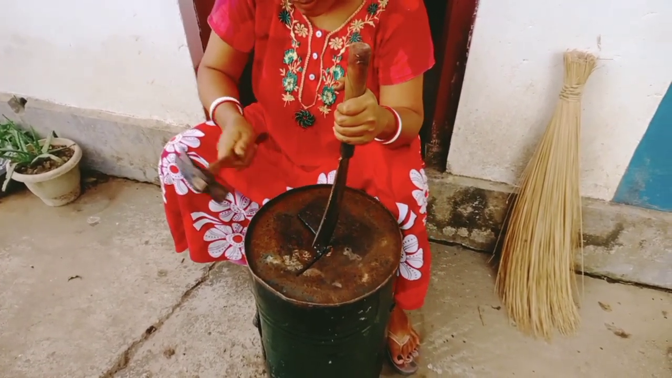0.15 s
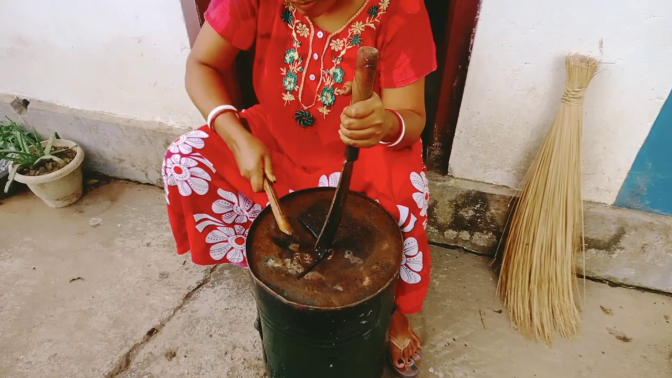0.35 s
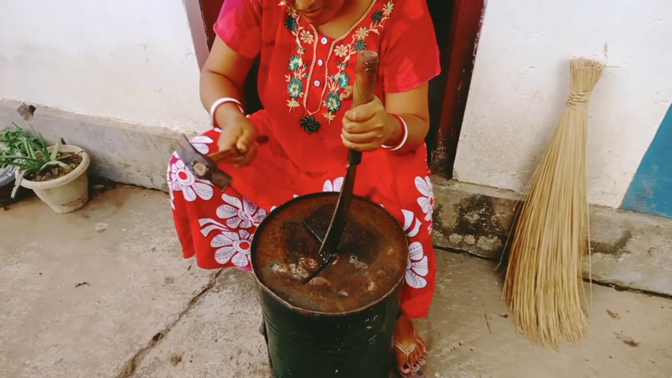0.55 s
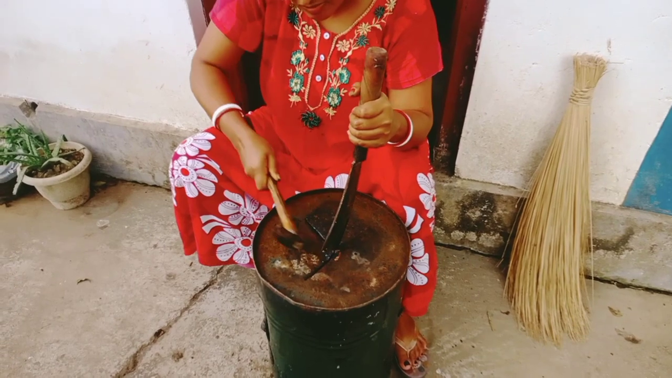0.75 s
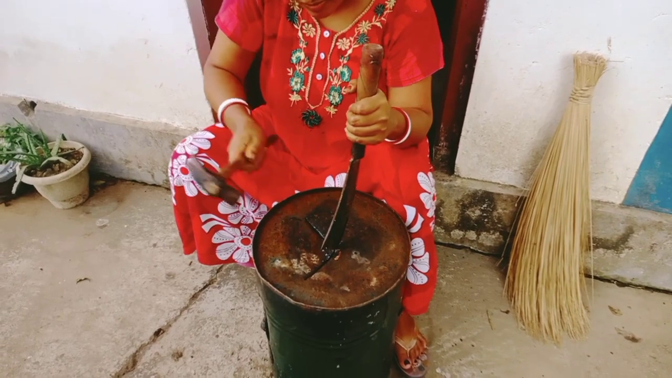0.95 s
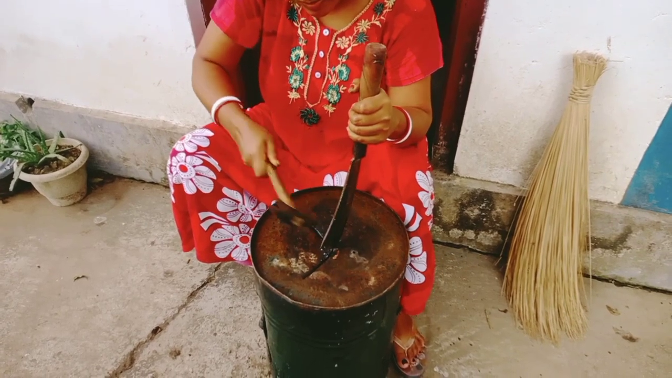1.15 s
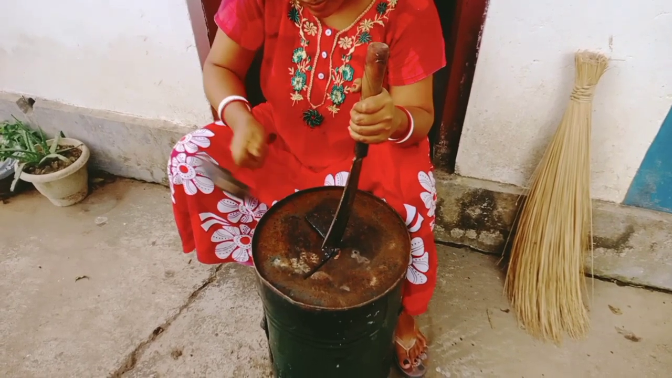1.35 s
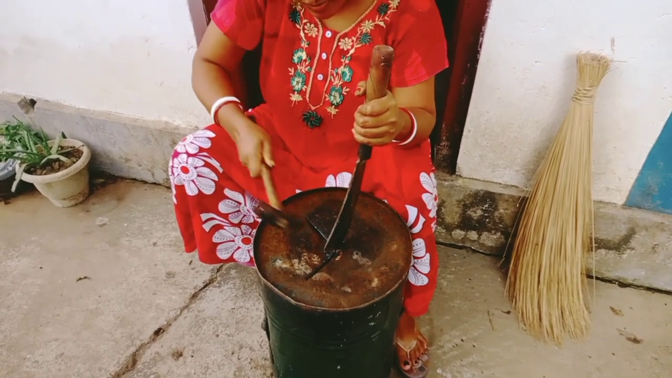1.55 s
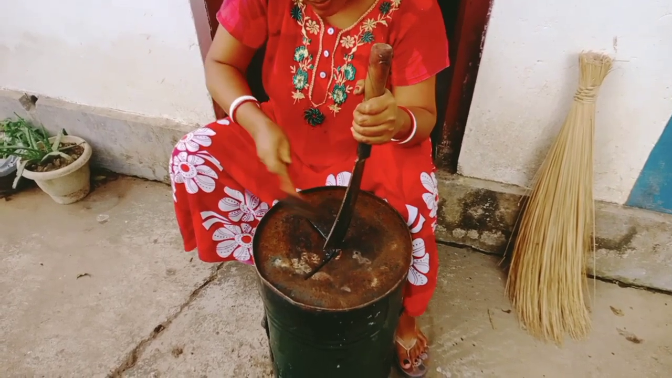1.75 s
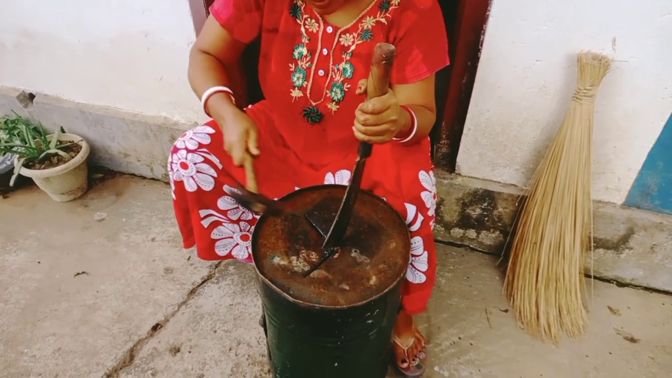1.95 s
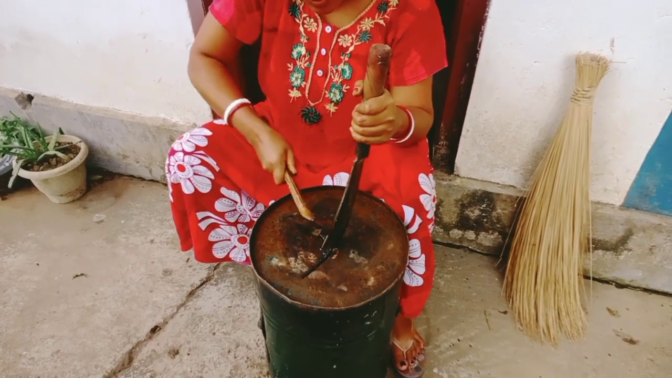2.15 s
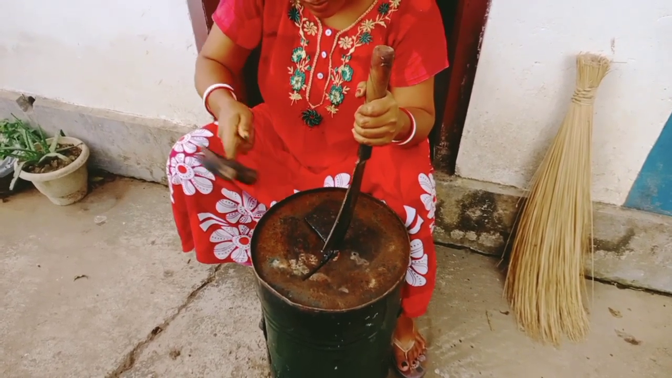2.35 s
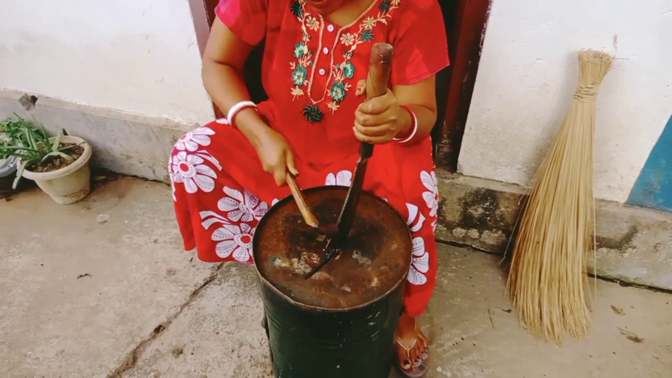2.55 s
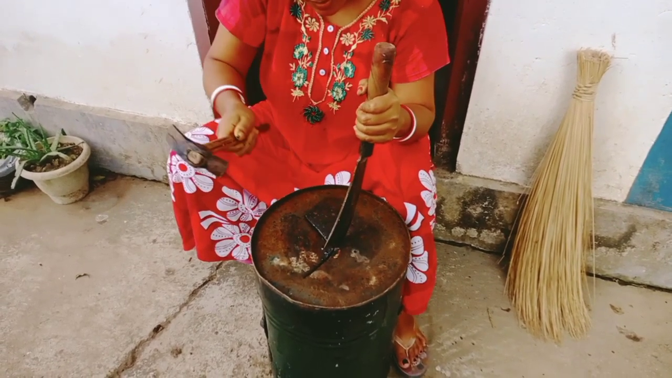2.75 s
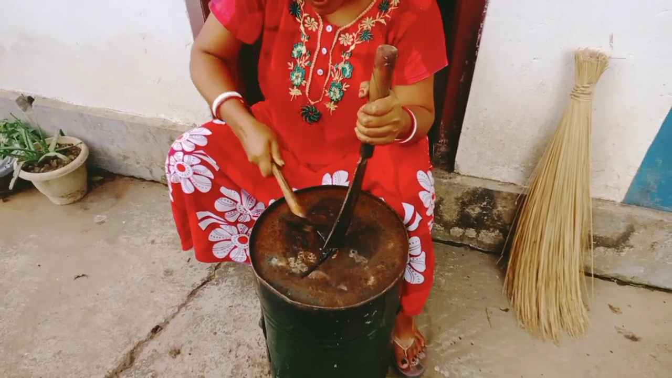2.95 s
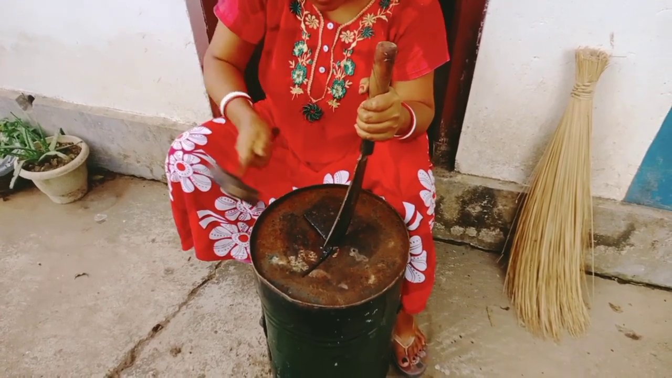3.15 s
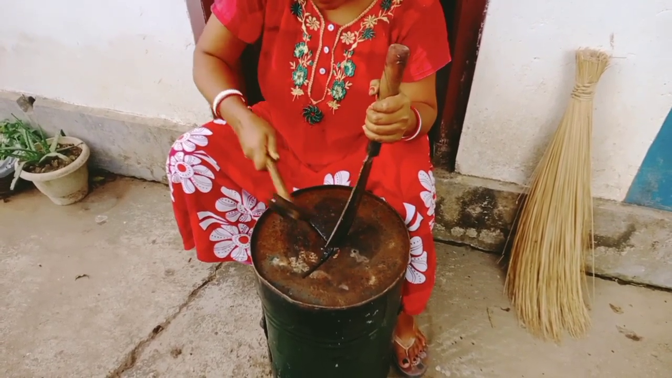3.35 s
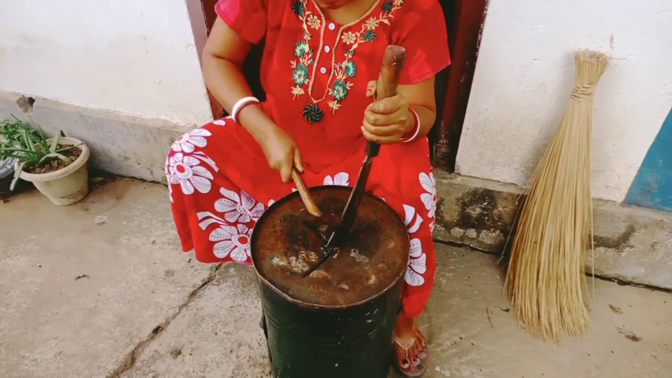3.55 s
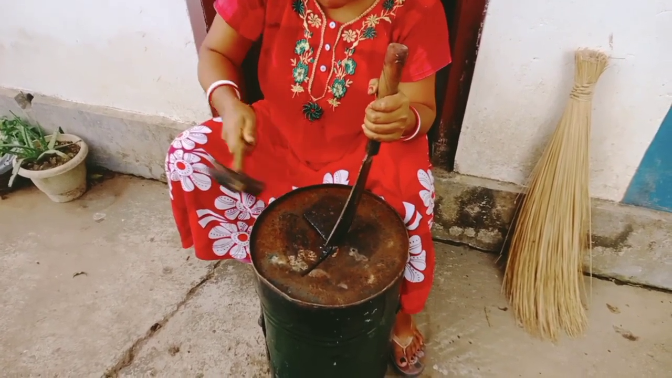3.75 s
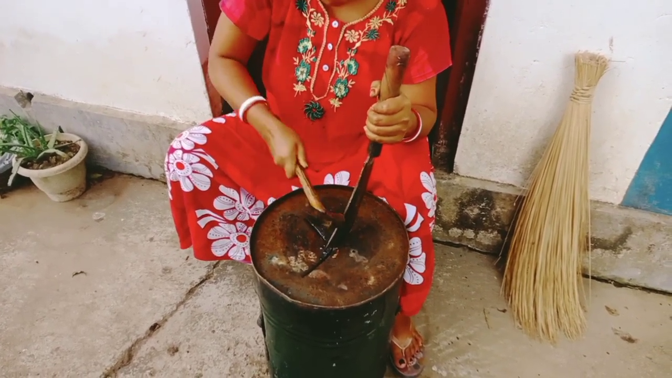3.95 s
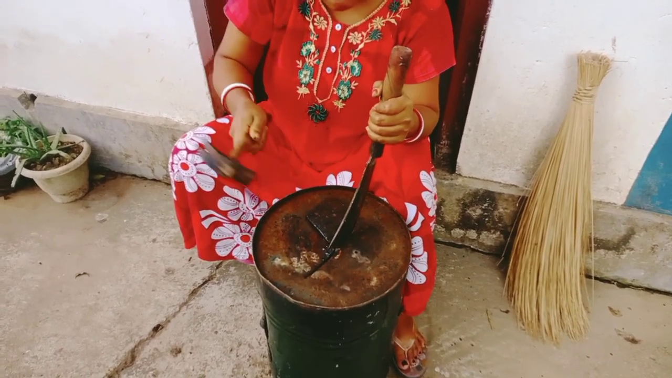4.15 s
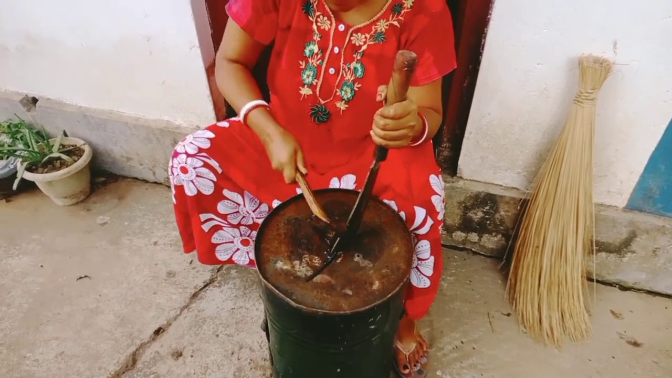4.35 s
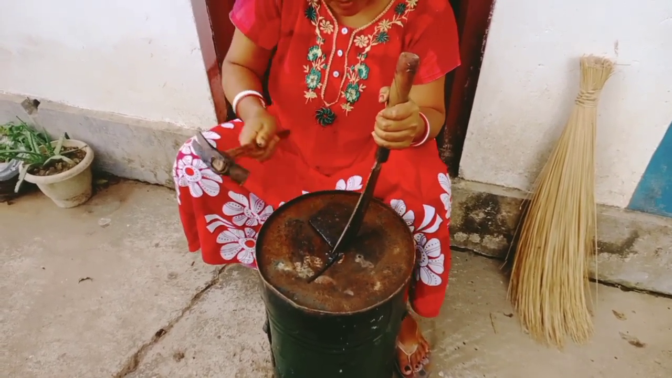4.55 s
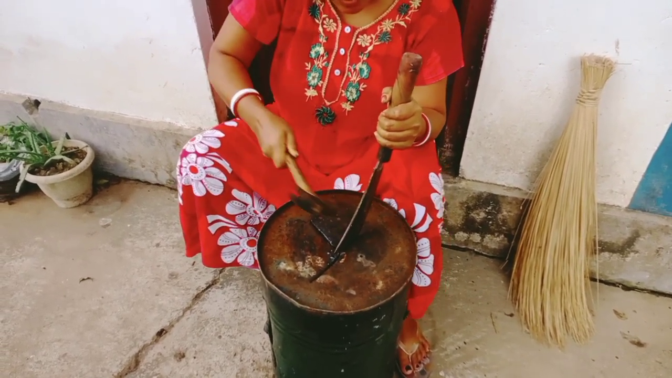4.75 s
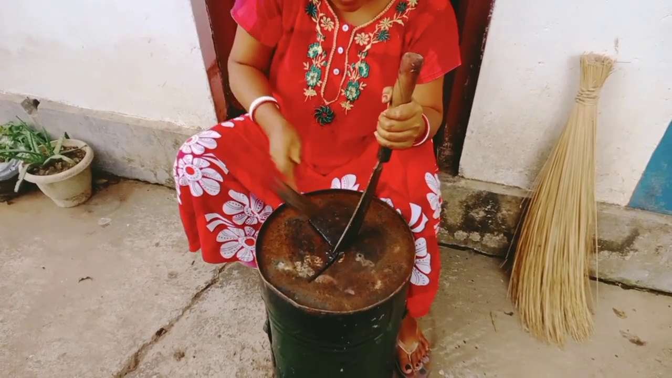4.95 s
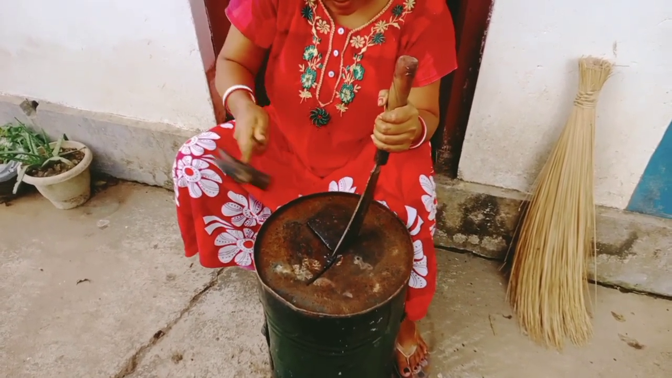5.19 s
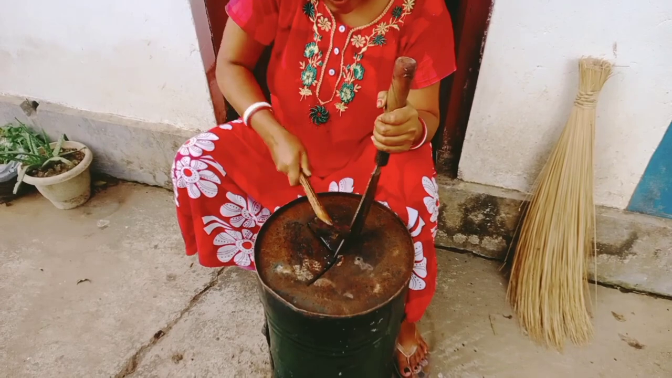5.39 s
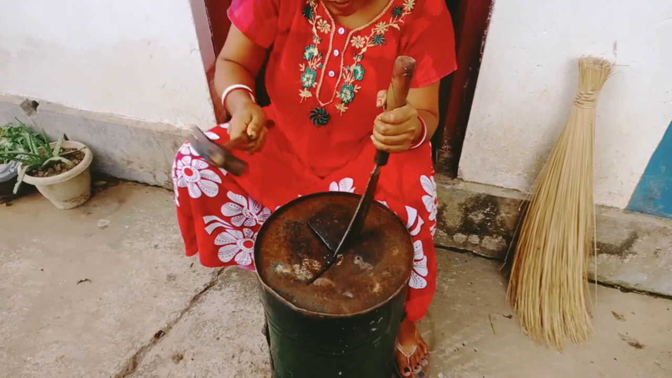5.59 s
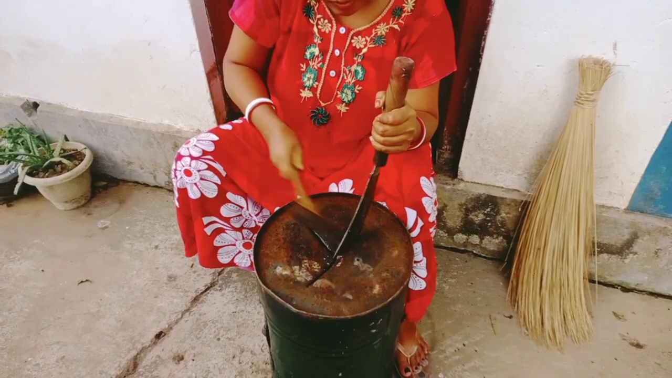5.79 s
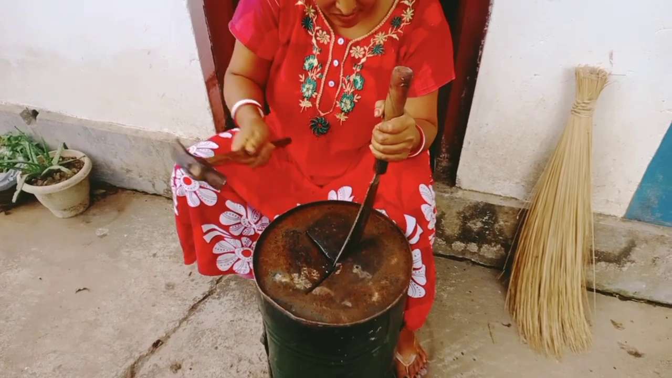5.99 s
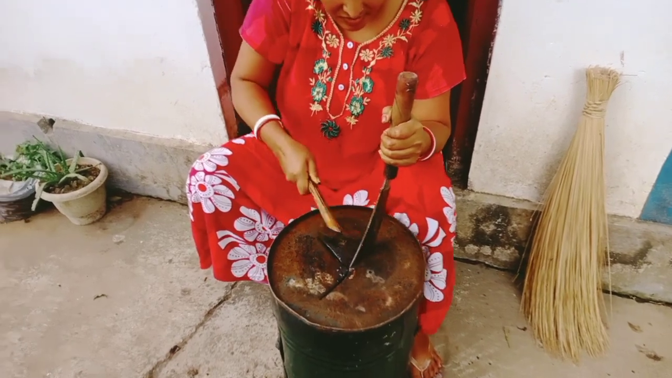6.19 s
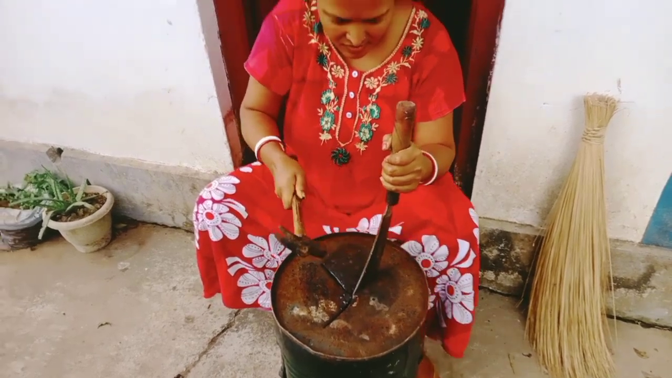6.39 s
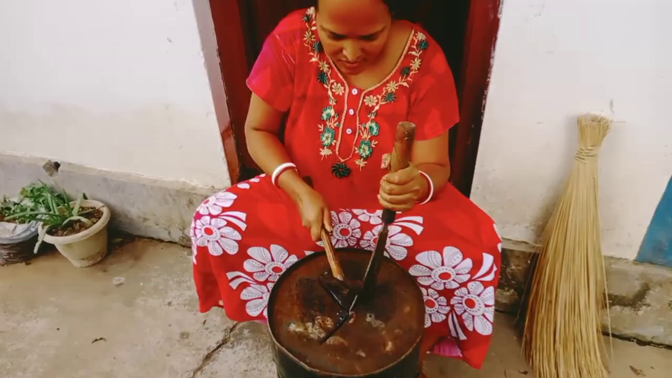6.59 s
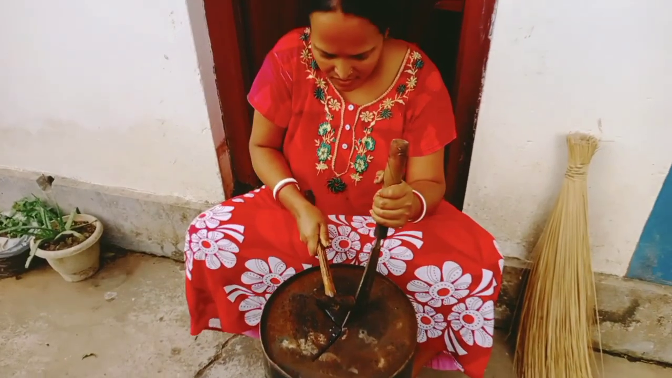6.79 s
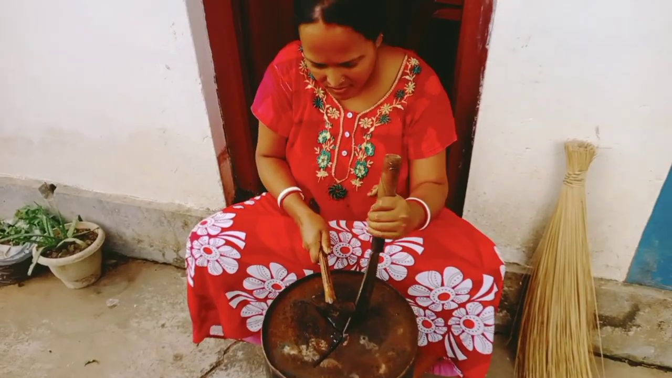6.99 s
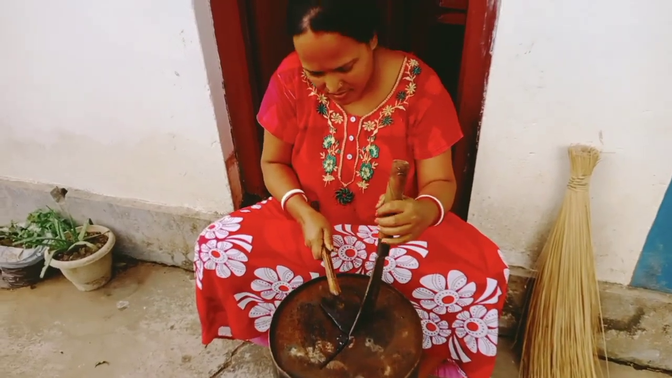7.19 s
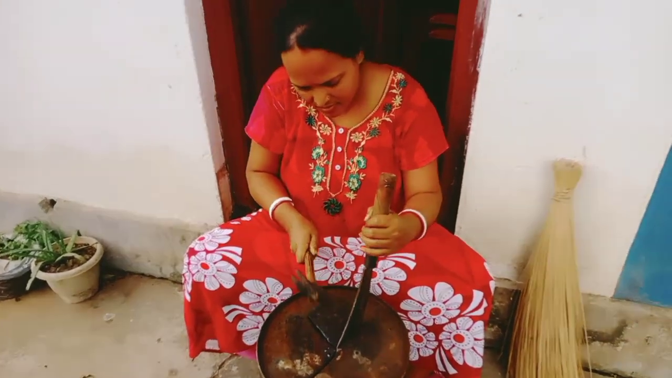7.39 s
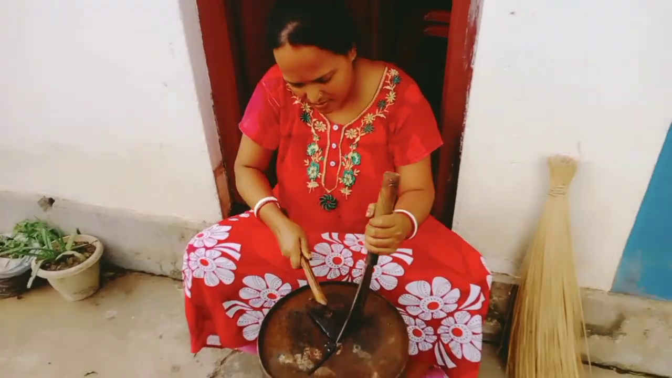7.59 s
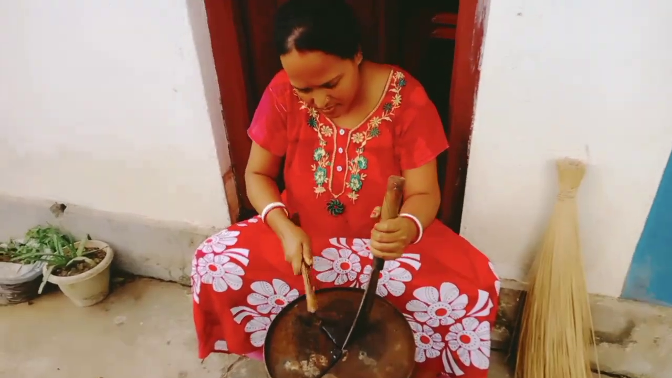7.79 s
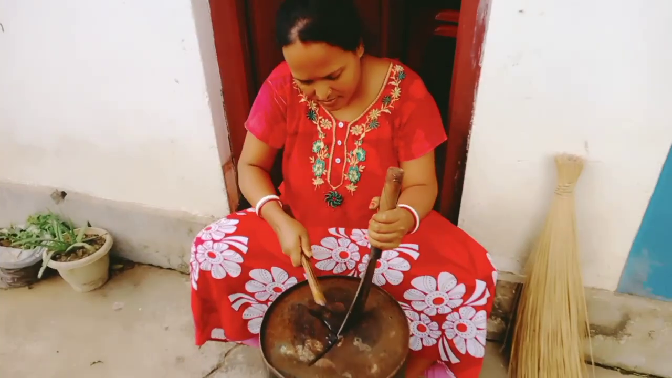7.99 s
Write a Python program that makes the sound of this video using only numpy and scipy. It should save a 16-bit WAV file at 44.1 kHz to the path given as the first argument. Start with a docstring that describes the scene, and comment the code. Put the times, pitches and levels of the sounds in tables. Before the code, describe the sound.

Close, sharp metallic strikes repeat at an even pace as a hammer knocks a blade through a drum lid. Every hit tears the sheet briefly, booms in the drum and leaves the lid ringing. Faint outdoor hiss lies behind, with a few thin, falling bird whistles early on. The hammering then grows lighter, breaks off for a soft scrape, and ends with two taps.

```python
"""Cutting open a metal drum

A hammer drives a blade through the rusty sheet-metal lid of a drum, in a yard beside a house wall.
Each blow tears the sheet with a short crack, thumps the drum and sets the lid ringing.
The last taps are lighter. A bird whistles far off, over a soft hiss and murmur.
A phone close by turns the sound down just ahead of each loud blow and flattens what is left of the peak."""
import sys
import numpy as np
from scipy import signal
from scipy.fft import rfft, irfft
from scipy.io import wavfile
from scipy.ndimage import uniform_filter1d, minimum_filter1d

SR = 44100
rng = np.random.default_rng(int(sys.argv[2]) if len(sys.argv) > 2 else 0)


def inscribe(sig):
    """Save sig as 16-bit PCM at rate SR to the path in sys.argv[1].

    A 1-D sig is mono; a 2-D sig holds one channel per row.
    Samples are clipped to [-1, 1] before scaling.
    """
    pcm = np.round(np.clip(np.atleast_2d(sig).T, -1, 1) * 32767)
    wavfile.write(sys.argv[1], SR, pcm.astype(np.int16))


N = 354123
RING_TIME = np.arange(SR) / SR  # one second for a sound to ring out

# the neighbourhood (time [s], murmur level [dB], hiss level [dB])
YARD_LEVELS = [(0, -41, -45.5), (1.3, -50, -47), (5.1, -45.5, -47), (6.2, -72, -55), (8.03, -75, -52.5)]
# the bird's falling whistles (time [s], length [s], level [dB])
WHISTLES = [(0.135, 0.096, -31), (.562, 0.038, -28.5), (0.961, 0.051, -29.5), (1.179, 0.058, -34.5),
            (1.398, .036, -29), (1.616, 0.056, -37.5)]
# faint, steady notes that lead into them (time [s], length [s], pitch [Hz], level [dB])
LEAD_NOTES = [(0, .17, 3036, -45), (0.509, .05, 4100, -42.5), (0.918, .05, 4080, -44),
              (1.348, 0.081, 4130, -48.5)]

# spectra: how strong a noise is from bass to treble (frequency [Hz], level [dB])
MURMUR_SPECTRUM = [(25, -9.5), (50, -15), (76, 2), (110, 0.5), (220, -2), (400, -4), (800, -12),
                   (2000, -20.5), (5000, -59)]  # the yard's low murmur
HISS_SPECTRUM = [(150, -21), (700, -16), (1100, -1.5), (1700, 4), (2450, 6.5), (3300, 0.5), (5000, -9),
                 (7000, -17), (9500, -30.5), (15000, -42)]  # outdoor hiss
CRACK_SPECTRUM = [(100, -8.5), (250, 12), (500, 3), (900, 3), (1500, -0.5), (2300, 1.5), (3300, -1.5),
                  (4500, -3.5), (5400, -11.5), (6400, -6), (7300, -36), (11500, -34), (14400, -23.5),
                  (16000, -49)]  # tearing metal
BOOM_SPECTRUM = [(60, -24), (100, -6), (135, 7.5), (175, 15.5), (290, 4), (380, -12.5), (480, -14),
                 (700, -52)]  # the drum's body
LID_SPECTRUM = [(250, -10.5), (450, 3), (700, -3), (1200, -4.5), (2300, -2.5), (3100, -6), (4300, -9.5),
                (5000, -14.5), (6600, -14), (7300, -25.5), (9000, -29.5), (12000, -37.5), (14400, -35.5),
                (15700, -44)]  # the shimmering lid

# modes: the notes a thing rings with when struck (pitch [Hz], level [dB], time to fade by 60 dB [s])
SHELL_MODES = [(175.5, 1.5, 0.32), (217.4, -3, 0.68), (272.6, 1.5, 0.43), (313, 8, 0.27),
               (348.8, 2.5, 0.37)]  # the drum's wall
HOLLOW_MODE = [(485, 0, .25)]  # the drum's hollow note
DRUMHEAD_MODE = [(113.5, 0, .58)]  # the whole lid swinging
LID_MODES = [(748, -8, .32), (870, -11, .42), (922, 0, .34), (1172, -5, .42), (1324, -11, .32),
             (1551, -2, .31), (1634, -9, .3), (1688, -8, .3), (1713, -8, .28), (1794, -8, .27),
             (1956, -8, .36), (1976, -8, .38), (2083, -11, .36), (2180, -10, .38), (2225, -9, .35),
             (2332, -9, .33), (2842, -11, .35), (3410, -13, .38), (3694, -15, .36), (4002, -16, .33)]  # the lid's clearest notes
HAMMER_MODES = [(14210, -4, .22), (14300, -1, .28), (14380, 0, .28), (14480, -5, .2)]  # the hammer head's thin zing
# the blade's modes (pitch [Hz], level when free [dB], level when wedged [dB], time to fade by 60 dB [s])
BLADE_MODES = [(5470, -16, 0, .25), (6205, -1, -9, .22), (6250, 1, -6, .2), (6540, -8, -14, .3),
               (9950, -34, -18, .3)]

# how deep the blade sits in the lid (time [s], depth [0-1])
BLADE_DEPTH = [(0, 0), (4.7, 0.29), (5.8, 1), (6.6, 1), (8.03, 0.18)]
# the blade is nudged in its slot (time [s], drum level [dB], scrape level [dB])
NUDGES = [(6.885, -45, -73), (6.93, -49, -70), (6.978, -41.5, -38.5), (7.64, -49, -62)]
# hammer blows (time [s], force [dB], tear length [s], tear pitch [Hz], hardness of contact [dB],
# shove against the ground [dB])
BLOWS = [(0.2708, 2.5, 0.0032, 1570, -2, -0.5), (0.6872, 3, 0.0063, 1850, -4.5, 1.5),
         (1.0609, 1, 0.0062, 1800, -1, -11), (1.4407, -2.5, 0.0052, 1650, 0.5, -11),
         (1.8086, -1.5, 0.0054, 425, 1, -12), (2.1632, 0.5, 0.002, 2200, 0, -17),
         (2.5307, 4, 0.006, 2480, -4, 0.5), (2.8895, 3.5, 0.0077, 1630, -6, -5),
         (3.2425, 2.5, 0.0042, 1900, -1.5, -9), (3.5842, 0.5, 0.0052, 670, -5, -3.5),
         (3.9464, 1, 0.0043, 2350, -8, -7), (4.289, 3, 0.0076, 1340, 1, -2),
         (4.6471, 3.5, 0.0061, 490, -2, -3.5), (5.017, 1.5, 0.0061, 2230, -5.5, -12),
         (5.369, 0, .0041, 470, -5, -14.5), (5.7413, -1, 0.0066, 2000, -3.5, -5),
         (6.1092, -3.5, 0.0053, 577, -1.5, -17.5), (6.5888, -6.5, 0.0024, 516, -8.5, -32),
         (7.4461, -4, .0075, 500, 0, -18), (7.765, -5.5, .003, 2780, -6.5, -32)]
# how each named part answers a blow (base level [dB], gain with force [dB per dB],
# gain with hardness [dB per dB], gain once the cut is wide [dB])
PART_LEVELS = {"crack": (6, 1, 0.5, -1), "drumhead": (-22, 0.18, 0.45, -15),
               "boom": (-1.04, 1.09, 0.48, -1.5), "hollow": (-14.5, 0.75, 0.1, 4.5),
               "lid": (-5, 0.9359, 0.05, -1), "rattle": (-6.5, 1.4, 0.23, 1), "ping": (-27.5, .4, 1, -1.5),
               "zing": (-49.5, 1, 0.5, -2)}


def undb(db):
    """Turn decibels into a number to multiply by."""
    return 10 ** (np.asarray(db) / 20)


def add(track, s, sound):
    """Mix a sound into the track, starting at s seconds."""
    start = max(int(s * SR), 0)
    part = sound[:max(len(track) - start, 0)]
    track[start:start + len(part)] += part


def colour(x, spectrum):
    """Shape a sound with a spectrum; white noise keeps its power."""
    hz, db = np.transpose(spectrum)
    f = np.fft.rfftfreq(len(x), 1 / SR) + 1e-9
    gain = undb(np.interp(np.log(f), np.log(hz), db)) * np.minimum(f / hz[0], 1) ** 2
    return irfft(rfft(x) * gain / np.sqrt(np.mean(gain ** 2)), len(x))


def brighten(spectrum, db, low_hz=3000, high_hz=11000):
    """Raise or lower the treble: a harder contact is brighter."""
    return [(hz, level + db / (1 + (low_hz / hz) ** 4 + (hz / high_hz) ** 4)) for hz, level in spectrum]


def fade(t60):
    """Die away, falling by 60 dB in t60 seconds."""
    return np.exp(-np.log(1000) * RING_TIME / t60)


def ring(modes, scatter_db, detune):
    """Struck modes ring; each blow lands somewhere new, so their levels and pitches vary a little."""
    out = np.zeros(SR)
    for (hz, db, t60), (weight, bend, side) in zip(modes, rng.standard_normal((len(modes), 3))):
        t = RING_TIME[:int(t60 * SR)]
        wave = np.sin(2 * np.pi * hz * (1 + detune * bend) * t) * np.exp(-np.log(1000) * t / t60)
        add(out, 0, np.sign(side) * undb(db + scatter_db * weight) * wave)
    return out


def crowded_modes(pattern, spectrum, kept):
    """Countless close modes blur into noise; a share is kept from blow to blow, the rest is new."""
    mixed = np.sqrt(kept) * pattern + np.sqrt(1 - kept) * rng.standard_normal(SR)
    return colour(mixed, spectrum)


def yard():
    """Smooth outdoor hiss over a low murmur that dies away."""
    t = np.arange(N) / SR
    times, murmur_db, hiss_db = np.transpose(YARD_LEVELS)
    murmur = undb(np.interp(t, times, murmur_db)) * colour(rng.standard_normal(N), MURMUR_SPECTRUM)
    hiss = undb(np.interp(t, times, hiss_db)) * colour(rng.standard_normal(N), HISS_SPECTRUM)
    return murmur + hiss


def bird(end_hz=2420, fall_hz_per_s=4800, waver=.008, echo_db=-8):
    """Faint steady notes and thin falling whistles, with a short echo from the houses."""
    out = np.zeros(N)
    falling = [(s, length, end_hz, fall_hz_per_s, db) for s, length, db in WHISTLES]
    steady = [(s, length, hz, 0, db) for s, length, hz, db in LEAD_NOTES]
    for s, length, last_hz, fall, db in falling + steady:
        progress = np.linspace(0, 1, int(length * SR))
        wobble = np.interp(progress, np.linspace(0, 1, 12), rng.standard_normal(12))
        hz = (last_hz + fall * length * (1 - progress)) * (1 + waver * wobble)
        tone = np.sin(2 * np.pi * np.cumsum(hz) / SR)
        add(out, s, undb(db) * np.sin(np.pi * progress) * tone)
    houses = rng.standard_normal(SR) * fade(.35)
    echo = signal.fftconvolve(out, houses / np.linalg.norm(houses))[:N]
    return out + undb(echo_db) * echo


def nudges(swell_s=0.0077):
    """The blade shifts softly in the cut with a dull scrape; the drum murmurs."""
    out = np.zeros(N)
    swell = 1 - np.exp(-RING_TIME / swell_s)
    for s, drum_db, scrape_db in NUDGES:
        drum = colour(rng.standard_normal(SR), BOOM_SPECTRUM) * fade(0.51)
        scrape = colour(rng.standard_normal(SR), brighten(LID_SPECTRUM, -21)) * fade(0.24)
        add(out, s, swell * (undb(drum_db) * drum + undb(scrape_db) * scrape))
    return out


def thump(hz=78, t60=0.072):
    """The drum is shoved against the ground."""
    return np.sin(2 * np.pi * hz * RING_TIME) * fade(t60)


def boom(pattern, crowd_db=-18.5, shell_db=-22, t60=0.53):
    """The drum's wall booms: a few strong modes among many close ones."""
    shell = ring(SHELL_MODES, scatter_db=2, detune=.012)
    crowd = crowded_modes(pattern, BOOM_SPECTRUM, kept=0.34) * fade(t60)
    return undb(crowd_db) * crowd + undb(shell_db) * shell


def hollow(depth, width, clonk_db=5, clonk_t60=.16, muffle_db=11, rise_hz=3):
    """The drum's hollow note rises as the cut opens; a slack lid adds a clonk, softer if wedged."""
    hz, db, t60 = HOLLOW_MODE[0]
    clonk = width * undb(clonk_db - muffle_db * depth) * fade(clonk_t60)
    tone = np.sin(2 * np.pi * (hz + rise_hz * width) * RING_TIME)
    return undb(db) * (fade(t60) + clonk) * tone


def drumhead(depth, wedged_db=8):
    """The whole lid swings like a drum skin; a deep blade pulls it tight, making it louder."""
    return undb(wedged_db * depth) * ring(DRUMHEAD_MODE, scatter_db=0, detune=.006)


def landing_spot(spectrum, ripple_db=4.0, count=90):
    """The spot where a blow lands makes some groups of modes stronger and others weaker."""
    points_hz, db = np.transpose(spectrum)
    hz = np.geomspace(points_hz[0] + 1200, points_hz[-1] + 1200, count) - 1200
    ripple = ripple_db * np.clip(rng.standard_normal(count), -2, 2)
    return list(zip(hz, np.interp(np.log(hz), np.log(points_hz), db) + ripple))


def cut_edge(spectrum, t60=0.3, count=40):
    """Each blow leaves new flaps along the cut, ringing at new pitches."""
    points_hz, db = np.transpose(spectrum)
    modes = [(hz, np.interp(hz, points_hz, db), t60) for hz in rng.uniform(600, 5000, count)]
    return ring(modes, scatter_db=1, detune=0)


def lid(pattern, spectrum, depth, force_db, muffle_db=6, t60=0.46, top_t60=0.36):
    """The sheet shimmers, its treble dying first; a deep blade muffles its clear notes."""
    crowd = crowded_modes(pattern, spectrum, kept=.3)
    body = signal.sosfiltfilt(signal.butter(4, 7500, fs=SR, output="sos"), crowd)
    treble = crowd - body
    stretch = np.exp(0.0073 * force_db)  # light taps ring shorter
    shimmer = body * fade(t60 * stretch) + treble * fade(top_t60 * stretch)
    clear = ring(LID_MODES, scatter_db=2.5, detune=.001)
    return undb(-14) * shimmer + undb(-15 - muffle_db * depth) * clear + undb(-25) * cut_edge(spectrum)


def shimmer_burst(spectrum, t60=0.12):
    """A short, fast-fading burst of the lid's shimmer just after each crack."""
    return colour(rng.standard_normal(SR), spectrum) * fade(t60)


def blade_ping(depth):
    """The steel pings in pulsing pairs of close notes; the lid's grip decides which are strong."""
    modes = [(hz, free + depth * (wedged - free), t60) for hz, free, wedged, t60 in BLADE_MODES]
    return ring(modes * 2, scatter_db=1.5, detune=.003) / np.sqrt(2)


def hammer_zing():
    """The hammer head rings with very high notes, each doubled slightly out of tune."""
    return ring(HAMMER_MODES * 2, scatter_db=2, detune=.006)


def crack(length, tear_hz, hardness_db, rise_s=0.00015, squawk_db=3):
    """The blade rips the sheet for a few milliseconds, then sticks; the torn edge squawks."""
    rise = np.minimum(RING_TIME / rise_s, 1)
    sticking = np.exp(-np.maximum(RING_TIME - .8 * length, 0) / .002)
    rip = rise * sticking * colour(rng.standard_normal(SR), brighten(CRACK_SPECTRUM, .5 * hardness_db))
    squawk = signal.lfilter(*signal.iirpeak(tear_hz, Q=4, fs=SR), rip)
    return rip + undb(squawk_db) * squawk


def hammering(widens_from_s=3.84, widens_for_s=1.72):
    """Each blow sounds every part; force, hardness and the width of the cut set the mix."""
    out = np.zeros(N)
    shell_pattern, lid_pattern = rng.standard_normal((2, SR))
    for s, force_db, length, tear_hz, hardness_db, shove_db in BLOWS:
        depth = np.interp(s, *np.transpose(BLADE_DEPTH))
        # a wide cut leaves the lid slack: the drumhead note weakens and the hollow note grows
        width = np.clip((s - widens_from_s) / widens_for_s, 0, 1)
        spectrum = landing_spot(brighten(LID_SPECTRUM, hardness_db))
        parts = [crack(length, tear_hz, hardness_db),  # same order as PART_LEVELS
                 drumhead(depth),
                 boom(shell_pattern),
                 hollow(depth, width),
                 lid(lid_pattern, spectrum, depth, force_db),
                 shimmer_burst(spectrum),
                 blade_ping(depth),
                 hammer_zing()]
        for part, (base_db, per_force, per_hardness, wide_db) in zip(parts, PART_LEVELS.values()):
            db = base_db + per_force * force_db + per_hardness * hardness_db + wide_db * width
            add(out, s, undb(db) * part)
        add(out, s, undb(shove_db) * thump())
    return out


def scene():
    """Hammering in front, bird and yard behind."""
    return (hammering() + nudges() + bird() + yard())[None]


def limiter(x, threshold_db=-12, share=0.63, look_ahead_s=.024, recovery_db_per_s=290):
    """Turn the sound down just before a loud peak, then bring it back at a steady rate."""
    power = uniform_filter1d(x ** 2, size=220)
    level_db = 10 * np.log10(np.maximum(power, 1e-12))
    cut_db = share * np.maximum(level_db - threshold_db, 0)
    reach = int(look_ahead_s * SR) // 2
    cut_db = -minimum_filter1d(-cut_db, 2 * reach + 1, origin=-reach)  # the biggest cut just ahead
    recovery = recovery_db_per_s * np.arange(N) / SR
    cut_db = np.maximum.accumulate(cut_db + recovery) - recovery
    return x * undb(-uniform_filter1d(cut_db, size=400))


def record(dry, low_cut_hz=60, high_cut_hz=15700):
    """The phone drops the deepest bass, tames loud peaks and cuts the highest treble."""
    x = signal.sosfilt(signal.butter(3, low_cut_hz, "high", fs=SR, output="sos"), dry[0])
    x = undb(-0.5) * limiter(x)
    x = .9 * x / (1 + x ** 8) ** (1 / 8)  # flatten the remaining peaks
    return signal.sosfilt(signal.ellip(8, .2, 70, high_cut_hz, fs=SR, output="sos"), x)[None]


dry = scene()
out = record(dry)
inscribe(out)
```